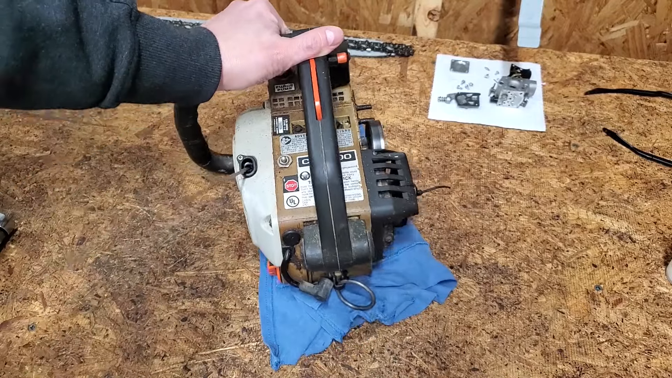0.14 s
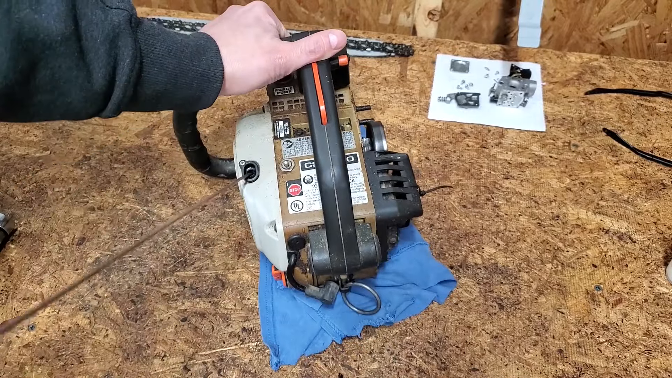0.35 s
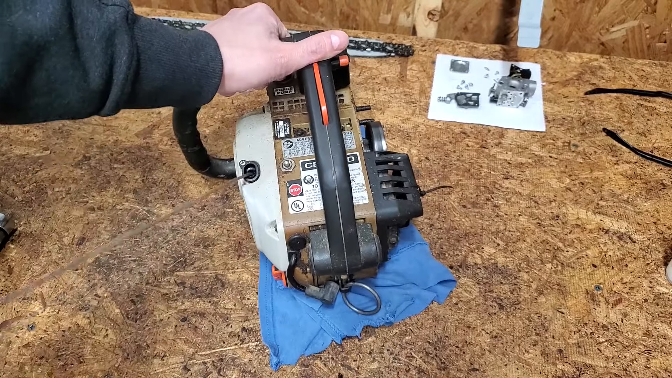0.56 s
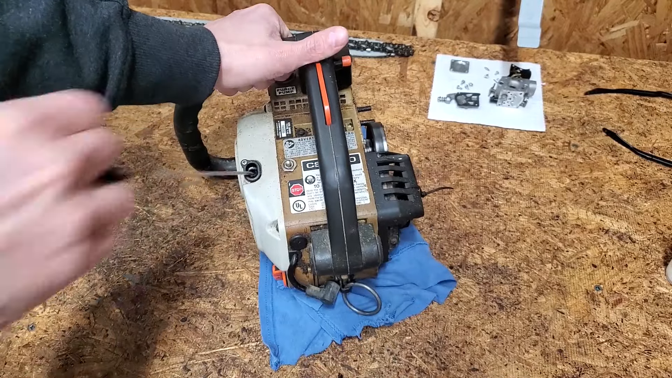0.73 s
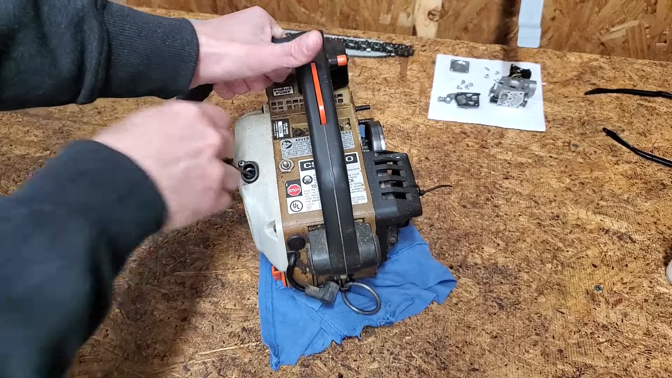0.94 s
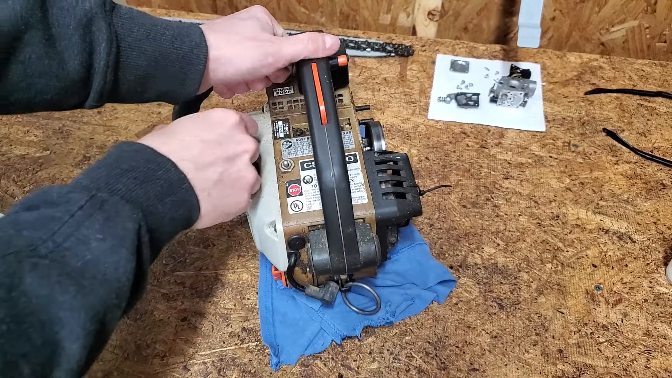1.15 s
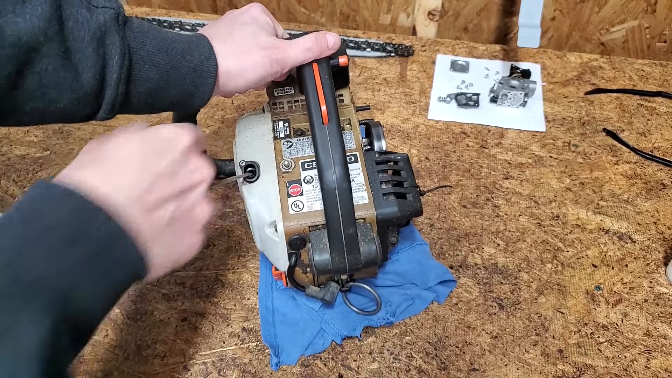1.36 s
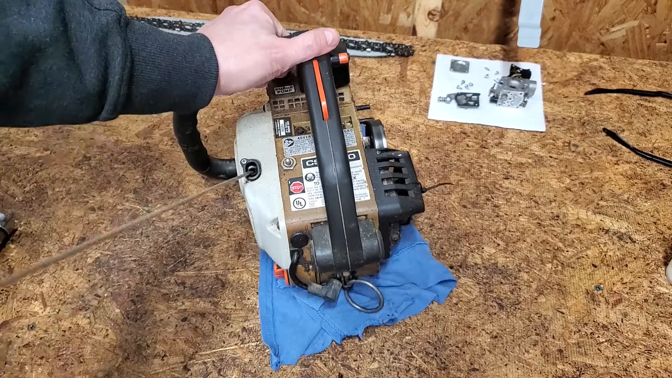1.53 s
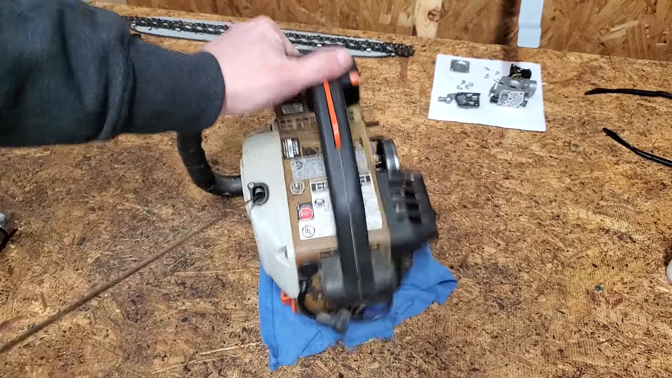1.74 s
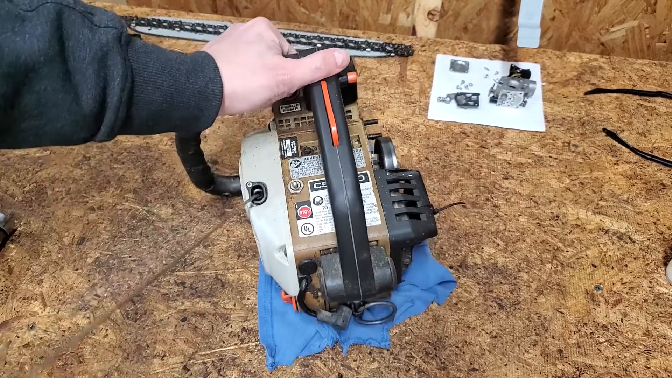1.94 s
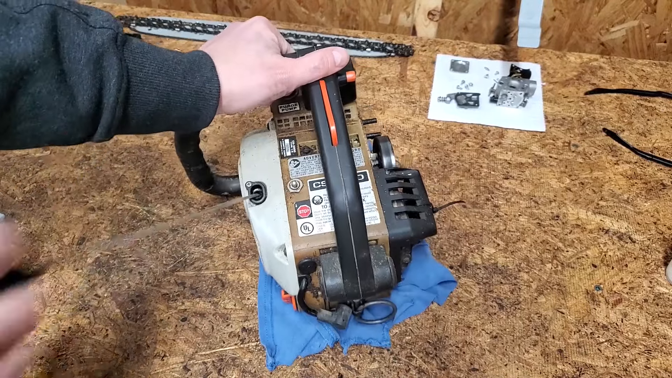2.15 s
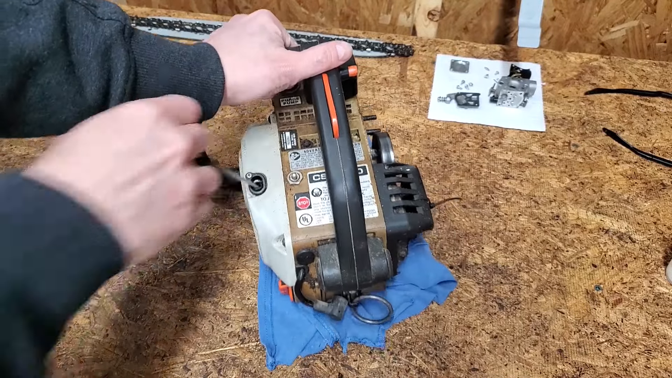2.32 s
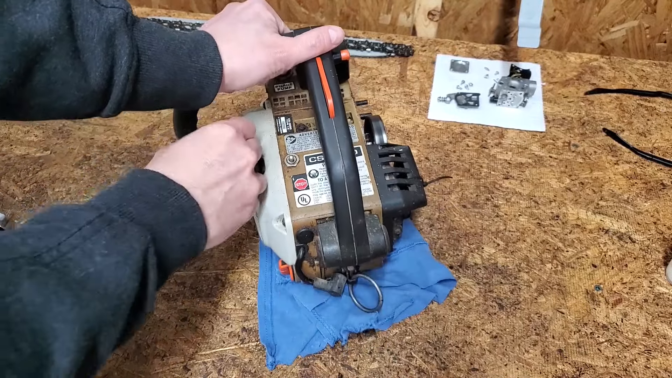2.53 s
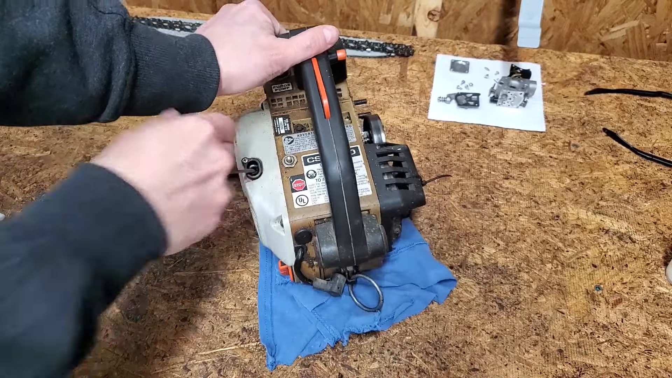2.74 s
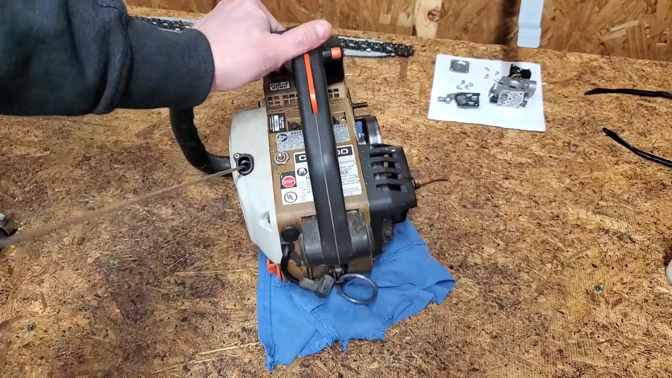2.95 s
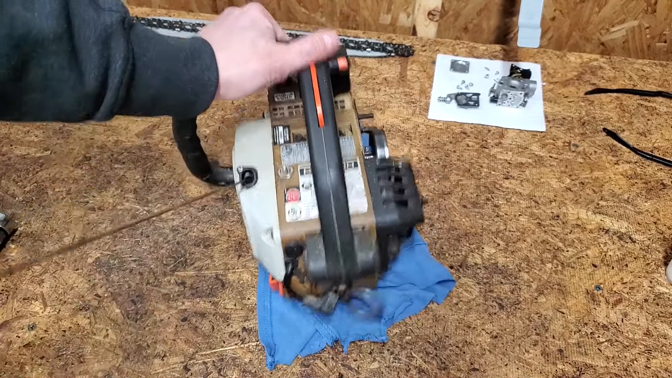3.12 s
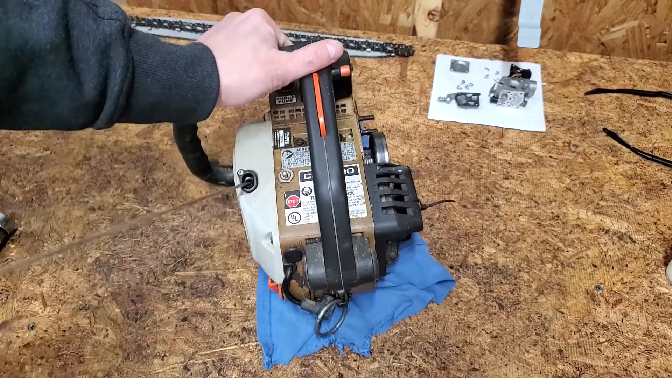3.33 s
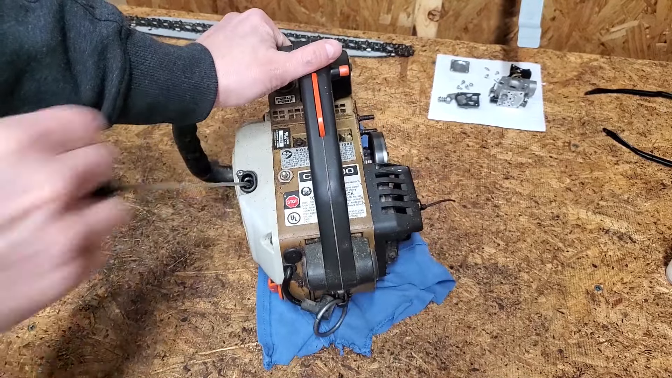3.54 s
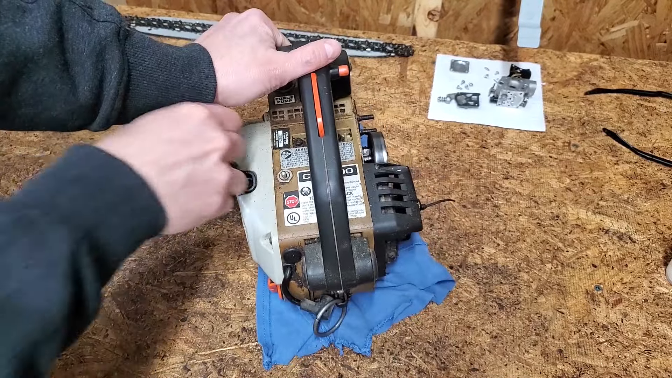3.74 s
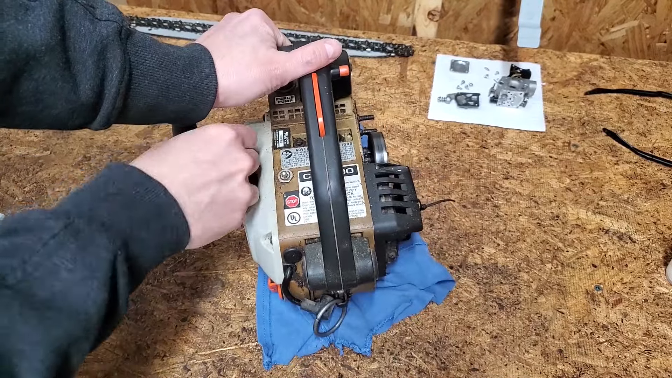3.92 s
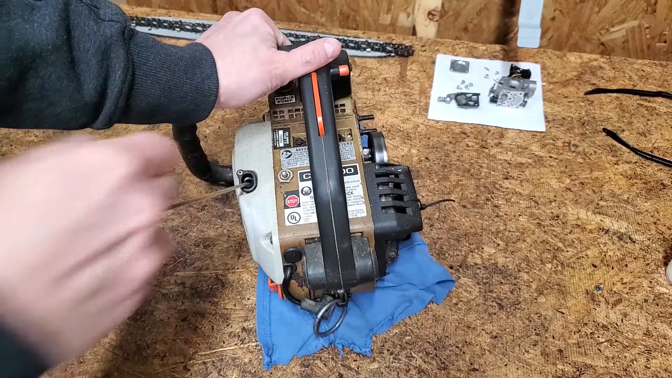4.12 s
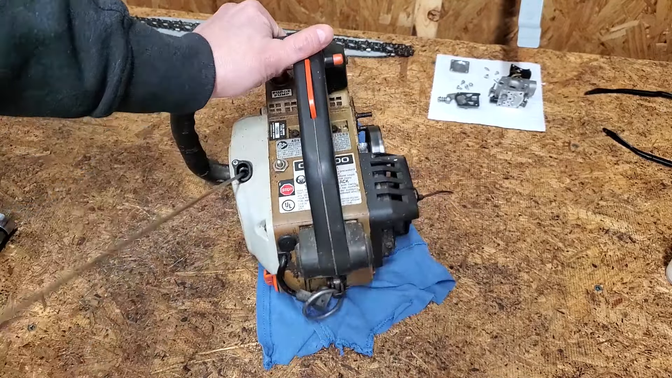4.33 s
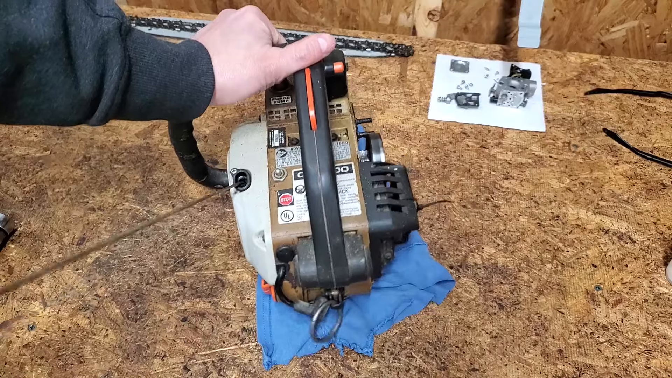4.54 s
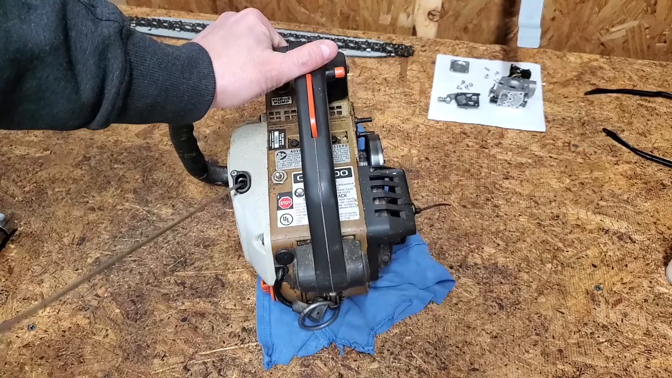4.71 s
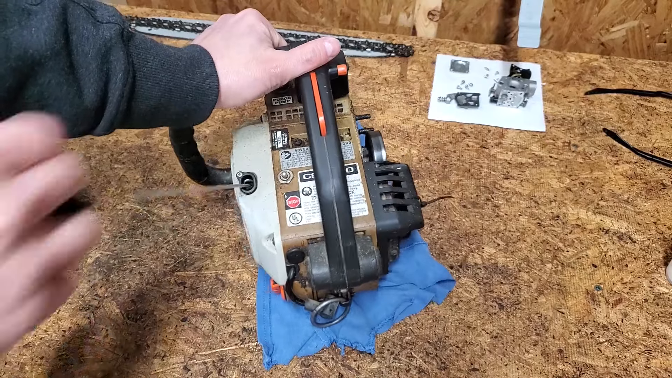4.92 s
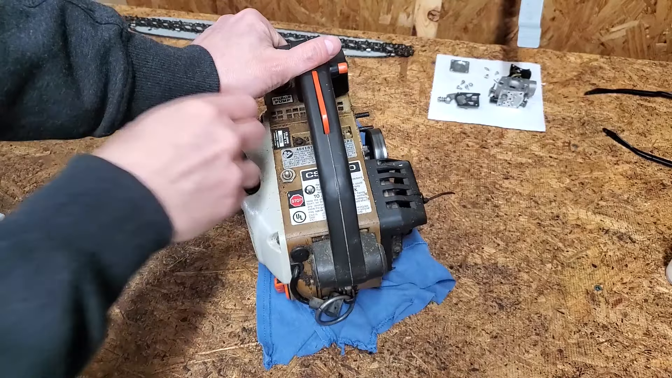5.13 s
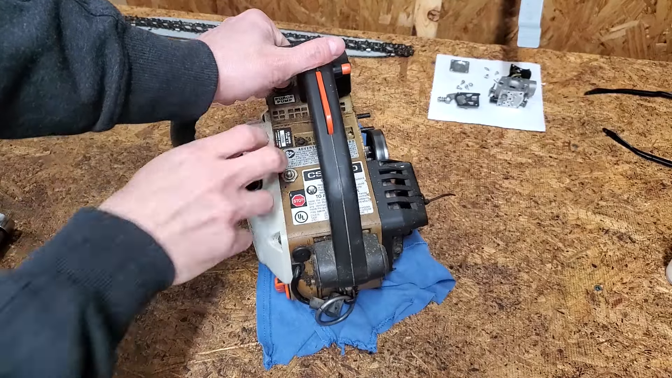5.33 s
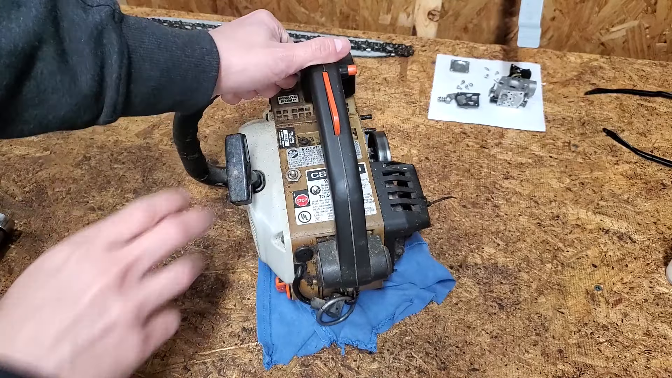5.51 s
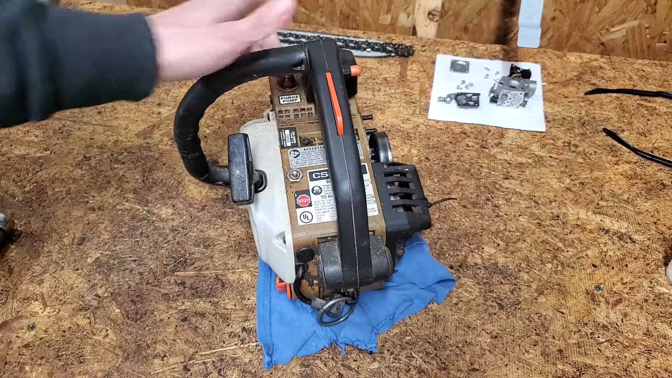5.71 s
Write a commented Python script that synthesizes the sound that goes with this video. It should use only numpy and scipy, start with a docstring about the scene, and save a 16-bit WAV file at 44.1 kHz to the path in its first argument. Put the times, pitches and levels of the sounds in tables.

```python
"""A chainsaw on a wooden workbench is pulled over four times and never fires, in a quiet workshop.
On each pull the rope rasps out as shaped noise and single pawl snaps are heard. Turns of the crank give
sharp spits (short tone pops with hiss) and, between them, hollow gulps of air (swelling low tones).
Then the rope rewinds: the starter pawls ratchet up to speed, slow down and ring the flywheel's modes.
Knocks of the handle and the housing fall throughout; the bench rumbles as the saw rocks."""
import sys
import numpy as np
from scipy import signal
from scipy.io import wavfile
from scipy.ndimage import uniform_filter1d

SR = 44100
rng = np.random.default_rng(int(sys.argv[2]) if len(sys.argv) > 2 else 0)


def dump_mix(stems):
    """Bounce the given channels to the path in sys.argv[1] as a 16-bit WAV at rate SR."""
    frames = np.atleast_2d(stems).T  # one column per channel
    limited = np.clip(frames, -1, 1)  # hard clip at full scale
    pcm = np.round(limited * 32767).astype(np.int16)
    wavfile.write(sys.argv[1], SR, pcm)


N = 254456
TIME = np.arange(N) / SR

# the rope is drawn out: (start/s, full speed/s, end/s, swell/dB per s, rasp level/dB, hiss level/dB,
# rocking level/dB), levels before trims
PULL_STROKES = [(0.0, 0.066, 0.21, 169, -28.5, -33, -39.5), (1.28, 1.587, 1.754, 135, -25.5, -30, -44),
                (2.75, 2.944, 3.08, 172.5, -26, -29.5, -39), (4.03, 4.376, 4.264, 123, -23, -28, -38.5)]
# the port opens once per crank turn, six turns a pull: (t/s, spit level/dB before trim)
PORT_OPENINGS = [(0.032, -6.5), (0.1148, 0), (0.1743, -3), (0.2273, -5.5), (0.281, -3), (0.3587, -13.5),
                 (1.4695, -10.5), (1.5625, -5), (1.6151, -4), (1.6608, -2.5), (1.7118, -5), (1.7942, -5),
                 (2.8899, -6), (2.956, -6.5), (3.0069, -9.5), (3.0542, -5), (3.1124, -5), (3.199, -3),
                 (4.3016, -4), (4.365, -7.5), (4.419, -4), (4.466, -11), (4.5149, 2), (4.579, -4.5)]
# the spring winds the rope back: (first tooth/s, number of teeth, steady gap/s, extra gap at the start/s,
# extra gap at the end/s)
ROPE_REWINDS = [(0.301, 13, .037, .0265, .0706), (1.798, 12, .0406, .018, .0655),
                (3.199, 12, .0312, .0187, .0892), (4.63, 12, .0363, .0118, .0638)]
# colour of the housing under the pawls: (f/Hz, relative level/dB)
HOUSING_COLOUR = [(100, -27.5), (300, -10.5), (550, 1.5), (830, 3.5), (1120, 4), (1500, -1), (2100, 1),
                  (3200, -3), (5000, -16), (12000, -34)]
# how many teeth the rewind takes to get going
SPEED_UP_TEETH = 3


def gain_of(db):
    """Decibels to a factor."""
    return 10 ** (np.asarray(db) / 20)


def evened(x):
    """Scales to rms 1."""
    return x / np.sqrt(np.mean(x ** 2) + 1e-20)


def read(points, hz):
    """Reads a table along log frequency."""
    f, value = np.transpose(points)
    return np.interp(np.log(hz + 1), np.log(f), value)


def add(mix, s, sound):
    """Mixes a sound in at time s."""
    part = mix[max(round(s * SR), 0):][:len(sound)]
    part += sound[:len(part)]


def colour(x, points, size=2048):
    """Passes x through a causal (minimum-phase) body of unit energy with this spectrum."""
    log_gain = np.log(gain_of(read(points, abs(np.fft.fftfreq(size, 1 / SR)))))
    response = np.fft.ifft(np.exp(np.conj(signal.hilbert(log_gain)))).real
    return signal.oaconvolve(x, response / np.linalg.norm(response))[:len(x)]


def grit(count, spread_db):
    """Tiny contacts of uneven size."""
    return evened(rng.standard_normal(count) * gain_of(spread_db * rng.standard_normal(count)))


def fade(t, t60):
    """A decay that starts at t = 0 and falls 60 dB in t60 seconds."""
    return (t >= 0) * np.exp(-np.log(1000) * np.maximum(t, 0) / t60)


def ramp_db(start, full, end, swell_db_per_s, fall_db_per_s):
    """An envelope in dB: silent before start, swelling until full, falling from end on."""
    swell = -swell_db_per_s * np.maximum(full - TIME, 0)
    fall = -fall_db_per_s * np.maximum(TIME - end, 0)
    return np.where(TIME < start, -np.inf, swell + fall)


def pulling():
    """1 while the rope is drawn out, 0 otherwise, with softened edges."""
    drawn = sum(1. * ((TIME > start) & (TIME < end)) for start, _, end, *_ in PULL_STROKES)
    return uniform_filter1d(drawn, size=1000)


def spits(trim_db=-3, hz=2550, rise=0.00059, lag=.0003, hiss_db=-13, hiss_t60=0.036, lead_t60=0.007):
    """A port opens: hiss swells into a pop of a few cycles and dies away."""
    # colour of the hiss: (f/Hz, relative level/dB)
    spit_colour = [(300, -54.5), (1200, -7), (1900, 2), (2550, 4.5), (3200, -2.5), (4500, -12.5),
                   (9000, -16.5), (16000, -55.5)]
    pops, hiss = np.zeros((2, N))
    t = np.arange(-(SR // 50), SR // 20) / SR
    age = np.maximum(t, 0) / rise
    pop_shape = (age * np.exp(1 - age)) ** 2
    hiss_shape = fade(t, hiss_t60) + fade(-t, lead_t60)
    for s, db in PORT_OPENINGS:
        pitch = hz * (1 + .035 * rng.standard_normal())
        tone = np.sin(2 * np.pi * pitch * t)
        add(pops, s + t[0] + lag, gain_of(db + trim_db) * pop_shape * tone)
        add(hiss, s + t[0] + lag, gain_of(db + hiss_db) * rng.standard_normal(len(t)) * hiss_shape)
    return pops + colour(hiss, spit_colour)


def strokes(share=0.3, fast_turn_s=0.045, fast_db=-3.5, db_per_doubling=14):
    """The piston's gulps, (s, dB): a share of a turn after the port, louder the faster the crank spins."""
    rows = []
    for ports in np.reshape([s for s, db in PORT_OPENINGS], (len(PULL_STROKES), -1)):
        turn = np.arange(len(ports))
        # a smooth curve through the port times gives the time and speed between them
        clock = np.polynomial.Polynomial.fit(turn, ports, len(ports) - 1)
        at = turn[:-1] + share
        doublings = np.log2(fast_turn_s / clock.deriv()(at))
        rows += zip(clock(at), fast_db + db_per_doubling * doublings)
    return rows


def gulps(trim_db=-2, lag=0.00057):
    """Each puff swells and dies in the cavities within a few cycles."""
    # air in the crankcase and muffler: (f/Hz, level/dB before trim, time to the peak/s)
    cavity_modes = [(289, 3, 0.0023), (479, -3, 0.0044), (216, -9, 0.003), (140, -14.5, 0.0027),
                    (791, -17.5, 0.014)]
    out, t = np.zeros(N), np.arange(SR // 20) / SR
    for s, db in strokes():
        for hz, mode_db, rise in cavity_modes:
            swell = (t / rise * np.exp(1 - t / rise)) ** 2.16
            pitch = hz * (1 + .03 * rng.standard_normal())
            tone = -np.sin(2 * np.pi * pitch * t)
            add(out, s + lag, gain_of(db + mode_db + trim_db) * swell * tone)
    return out


def teeth(first, count, steady, extra_start, extra_end, slow_down_teeth=1.8, reference_gap_s=0.05):
    """One rewind speeds up, runs steadily and is braked by the hand: tooth times, halvings of speed at each."""
    k = np.arange(count - 1)
    starting = extra_start * np.exp(-(k / SPEED_UP_TEETH) ** 2)
    braking = extra_end * np.exp(-k[::-1] / slow_down_teeth)
    times = first + np.r_[0, np.cumsum(steady + starting + braking)]
    # halvings are counted from the reference gap, and negative when faster
    return times, np.log2(np.gradient(times) / reference_gap_s)


def pawl_snaps(tooth_housing_db=-13, tooth_steel_db=-20, housing_loss_db=4, steel_loss_db=2.5,
               soft_start_db=-6, scatter_db=1):
    """Every snap of a pawl, (s, housing dB, steel dB): single ones, and the rewind's teeth, harder when faster."""
    # single pawl snaps around the pulls and at the start of rewinds:
    # (t/s, housing level/dB, steel level/dB), before trims
    single_snaps = [(0.149, -4, -22), (0.301, -7, -16), (1.29, -37, -54), (1.384, -18.5, -33.5),
                    (1.521, -12.5, -29.5), (1.586, -33, -21), (1.705, -19.5, -19), (1.818, -12.5, -39),
                    (2.754, -32, -47), (2.825, -11.5, -27.5), (3.082, -3, -16), (3.101, -2.5, -22),
                    (3.155, -11.5, -23.5), (4.035, -40.5, -51), (4.081, -25, -34.5), (4.193, -18.5, -63),
                    (4.253, -16.5, -30.5), (4.364, -11.5, -24.5)]
    # how hard the pawls bear on the flywheel, once per rewind: (level/dB)
    press_levels = [-0.087, -0.42, -0.092, -0.39]
    rows = list(single_snaps)
    for row, press_db in zip(ROPE_REWINDS, press_levels):
        times, slow = teeth(*row)
        starting = np.exp(-(np.arange(len(times)) / SPEED_UP_TEETH) ** 2)
        housing, steel = press_db + scatter_db * rng.standard_normal((len(times), 2)).T
        # losses are per halving of speed
        housing += tooth_housing_db - housing_loss_db * slow + soft_start_db * starting
        steel += tooth_steel_db - steel_loss_db * slow
        rows += zip(times, housing, steel)
    return sorted(rows)


def ratchet(snap_db=1, clack_db=-11, longest_pair_gap=0.0072, second=0.56, snap_t60=0.038, clack_t60=0.041,
            rise=0.00028):
    """Two pawls drop just after each other and chatter on the steel and in the housing."""
    snaps, clacks = np.zeros((2, N))
    t = np.arange(SR // 8) / SR
    onset = 1 - np.exp(-t / rise)
    for s, housing_db, steel_db in pawl_snaps():
        late = t - longest_pair_gap * rng.uniform(0.44, 1.0)
        chatter = onset * rng.standard_normal(len(t))
        snap = chatter * (fade(t, snap_t60) + second * fade(late, snap_t60))
        clack = chatter * (fade(t, clack_t60) + second * fade(late, clack_t60))
        add(snaps, s, gain_of(steel_db + snap_db) * snap)
        add(clacks, s, gain_of(housing_db + clack_db) * clack)
    return flywheel(snaps) + colour(clacks, HOUSING_COLOUR)


def rewind(body_db=-30, steel_db=-36, body_loss_db=8, steel_loss_db=10, body_fall_db_per_s=70,
           steel_fall_db_per_s=300, rattle_db=3.0, stop_t60=0.051):
    """After each snap the pawls fly free, then land and scrape up the next tooth in tiny slips, softer when slower."""
    # the rope is all wound in and the pulley stops, once per rewind: (t/s)
    home_times = [1.07, 2.56, 3.83, 5.27]
    # a pawl's contact from one snap to the next: (share of the tooth, level/dB)
    contact_curve = [(0, -2.5), (.15, -9), (.44, -19.5), (.54, 0.5), (1, -1)]
    body, steel = np.zeros((2, N))
    for (_, _, released, *_), row, home in zip(PULL_STROKES, ROPE_REWINDS, home_times):
        times, slow = teeth(*row)
        tooth = np.interp(TIME, times, np.arange(len(times))) % 1
        contact = gain_of(np.interp(tooth, *np.transpose(contact_curve)))
        contact *= fade(np.maximum(TIME - home, 0), stop_t60)
        slow = np.interp(TIME, times, slow)
        body_ramp = ramp_db(released, released, times[-1], 0, body_fall_db_per_s)
        steel_ramp = ramp_db(released, released, times[-1], 0, steel_fall_db_per_s)
        body += contact * gain_of(body_ramp - body_loss_db * slow)
        steel += contact * gain_of(steel_ramp - steel_loss_db * slow)
    rattle = gain_of(rattle_db * evened(uniform_filter1d(rng.standard_normal(N), size=250)))
    slips = grit(N, 3.5) * rattle
    scrape = gain_of(body_db) * colour(slips * body, HOUSING_COLOUR)
    return scrape + gain_of(steel_db) * flywheel(slips * steel)


def flywheel(drive, count=9, ring_db=-2.5, pressed_loss=.85):
    """Contacts on the steel are heard at once and set the flywheel's modes ringing."""
    # ringing modes: (f/Hz, relative level/dB, t60/s)
    flywheel_modes = [(3036, -13, .06), (3901, -5, .14), (4255, -6, .08), (4282, -5.5, .1), (5103, -6, .1),
                      (5938, -9, .18), (6620, -2, .1), (6648, -6, .24), (7493, -12, .06), (7884, -13, .08),
                      (8118, -14, .08), (8735, -10, .06), (8795, -10, .06), (9195, -12, .06),
                      (9960, -15, .05), (10430, -13, .06), (11093, -17, .1), (11800, -20, .07),
                      (11956, -17, .08), (12210, -20, .07), (12340, -20, .07), (12860, -16, .05),
                      (13280, -14, .06), (13340, -14, .06), (14000, -21, .07), (15050, -20, .06),
                      (15315, -17, .05)]
    # colour of the direct contact: (f/Hz, relative level/dB)
    steel_colour = [(1500, -1), (3000, 2.5), (3800, 5.5), (4500, 2), (5000, 2), (5500, -4), (6600, 3.5),
                    (7800, -0.5), (9600, 2.5), (10400, -3), (11200, -13), (13200, -4), (16000, -23)]
    t = np.arange(SR // 3) / SR
    hz, db, t60 = np.transpose(flywheel_modes)[:, :, None]
    modes = gain_of(db) * fade(t, t60) * np.sin(2 * np.pi * hz * t)
    # pawls pressed against the flywheel during a pull let less of the drive ring it
    free = drive * gain_of(ring_db) * (1 - pressed_loss * pulling())
    # each tooth is met at one of a few spots, and each spot excites its own mix of the modes
    times = np.concatenate([teeth(*row)[0] for row in ROPE_REWINDS])
    spot = rng.integers(count, size=len(times) + 1)[np.searchsorted(times, TIME)]
    out = colour(drive, steel_colour)
    for k in range(count):
        mode_mix = rng.choice([-1, 1], len(modes)) * gain_of(rng.uniform(-4, 4, len(modes)))
        ring = mode_mix @ modes
        out += signal.oaconvolve(free * (spot == k), ring / np.linalg.norm(ring))[:N]
    return out


def knocks(trim_db=9, chatter=0.18, chatter_t60=0.028, lead=0.042, lead_t60=0.011):
    """A short scuff ends in one blow on the housing; loose parts chatter after it."""
    # knocks of the handle and the housing: (t/s, level/dB before trim)
    blows = [(0.464, -2.5), (0.888, -13.5), (1.06, -11), (1.737, -1.5), (1.853, -0.5), (2.354, -17),
             (2.552, -16.5), (2.826, -11), (3.083, -3.5), (3.126, -6), (3.282, -0.5), (3.846, -21),
             (4.083, -18.5), (4.504, -4.5), (4.689, -1), (5.356, -34.5)]
    # colour of a blow on the housing: (f/Hz, relative level/dB)
    knock_colour = [(150, -34), (500, -9), (750, 2), (1150, 3), (1500, -0.5), (2000, -2), (3000, -12),
                    (6000, -23), (16000, -47.5)]
    out, t = np.zeros(N), np.arange(-(SR // 50), SR // 10) / SR
    looseness = chatter * fade(t, chatter_t60) + lead * fade(-t, lead_t60)
    for s, db in blows:
        drive = (t == 0) + rng.standard_normal(len(t)) * looseness
        add(out, s + t[0] + .0007, gain_of(db + trim_db) * drive)
    return colour(out, knock_colour)


def rope(rasp_db=0, hiss_db=-1, grain_db=3, fall_db_per_s=130, hiss_steepness=1.02, rasp_surge_db=2.5,
         hiss_surge_db=2, surge_phase=0.68):
    """The braid rasps through its eyelet, louder as the pull gathers speed, surging once in each crank turn."""
    # colour of the rasp: (f/Hz, relative level/dB)
    rasp_colour = [(59, -39), (100, -13), (246, -11), (402, -8), (531, -0.5), (761, -3), (1130, -2),
                   (1730, -13), (2510, -13.5), (2960, -9), (3430, -23), (4530, -20), (5000, -19),
                   (6500, -49.5), (11000, -120)]
    # colour of the rope's fibres: (f/Hz, relative level/dB)
    fibre_colour = [(1500, -7.5), (3500, 0.5), (6500, -0.5), (9500, -5.5), (12000, -11), (16000, -15.5)]
    body, hiss = np.zeros((2, N))
    for start, full, end, swell, body_db, fizz_db, _ in PULL_STROKES:
        speed_db = ramp_db(start, full, end, swell, fall_db_per_s)
        body += gain_of(body_db + speed_db)
        hiss += gain_of(fizz_db + hiss_steepness * speed_db)
    crank = np.interp(TIME, [s for s, db in PORT_OPENINGS], np.arange(len(PORT_OPENINGS)))
    surge = pulling() * np.cos(2 * np.pi * (crank - surge_phase))
    braid = gain_of(grain_db * evened(uniform_filter1d(rng.standard_normal(N), size=120)))
    strands, fibres = grit(N, 3), grit(N, 5)
    rasp = colour(strands * braid * body * gain_of(rasp_surge_db * surge), rasp_colour)
    fizz = colour(fibres * braid * hiss * gain_of(hiss_surge_db * surge), fibre_colour)
    return gain_of(rasp_db) * rasp + gain_of(hiss_db) * fizz


def bench(trim_db=-2, swell_db_per_s=65, fall_db_per_s=34, lurch_hold=0.041, lurch_fall_db_per_s=90,
          rest_s=5.4, rest_t60=.4):
    """The bench top rumbles as each pull rocks the saw, and again when the saw drops back, until it rests."""
    # the saw drops back on the bench after a hard pull: (t/s, level/dB before trim)
    lurches = [(1.81, -29), (3.23, -32.5), (4.73, -43)]
    # colour of the bench top: (f/Hz, relative level/dB)
    bench_colour = [(18, -38.5), (30, -9.5), (45, -4.5), (70, -5.5), (120, -6), (200, -8), (400, -45.5),
                    (1000, -93.5)]
    rocking = np.zeros(N)
    for start, full, end, *_, db in PULL_STROKES:
        rocking += gain_of(db + ramp_db(start, full, end, swell_db_per_s, fall_db_per_s))
    for s, db in lurches:
        rocking += gain_of(db + ramp_db(s, s, s + lurch_hold, 0, lurch_fall_db_per_s))
    rocking *= fade(np.maximum(TIME - rest_s, 0), rest_t60)
    return gain_of(trim_db) * rocking * colour(rng.standard_normal(N), bench_colour)


def workshop(x, wet_db=-12, delay=0.0066):
    """Scattered reflections from bench and walls, each band dying at its own speed."""
    # decay of the workshop: (f/Hz, t60/s)
    shop_decay = [(150, 0.23), (600, 0.34), (1300, 0.23), (4000, 0.2), (9000, 0.17), (16000, 0.31)]
    taps = rng.standard_normal(SR // 2) * (rng.random(SR // 2) < .08)
    hz, t, z = signal.stft(taps, SR, nperseg=256)
    tail = signal.istft(z * fade(t, read(shop_decay, hz)[:, None]), SR, nperseg=256)[1]
    # silent for one delay, then rising over another
    tail *= np.clip(np.arange(len(tail)) / SR / delay - 1, 0, 1)
    return x + gain_of(wet_db) * signal.fftconvolve(x, tail / np.linalg.norm(tail))[:N]


def room_tone(level_db=-76.5):
    """Faint steady noise, weighted to the lows."""
    # colour of the quiet room, with a low hum: (f/Hz, relative level/dB)
    quiet_colour = [(30, 3), (130, -12.5), (190, 6.5), (260, -11.5), (1000, -10), (4000, -12),
                    (9000, -17.5), (16000, -27.5)]
    return gain_of(level_db) * colour(rng.standard_normal(N), quiet_colour)


def scene():
    """The saw in its quiet workshop."""
    saw = spits() + gulps() + ratchet() + rewind() + knocks() + rope() + bench()
    return (workshop(saw) + room_tone())[None]


def record(dry, bass_hz=36, edge_hz=16200):
    """The microphone drops the deepest bass; full-scale clipping, then the band limit."""
    heard = signal.sosfilt(signal.butter(4, bass_hz, "highpass", fs=SR, output="sos"), dry)
    band_limit = signal.firwin(511, edge_hz, window=("kaiser", 9), fs=SR)[None]
    return signal.oaconvolve(np.clip(heard, -1, 1), band_limit, "same")


dry = scene()
out = record(dry)
dump_mix(out)
```